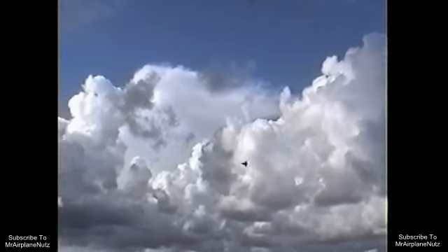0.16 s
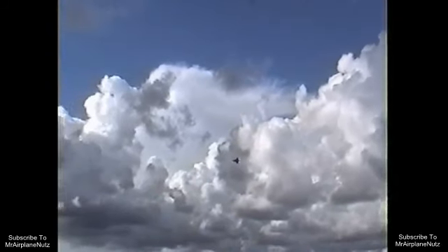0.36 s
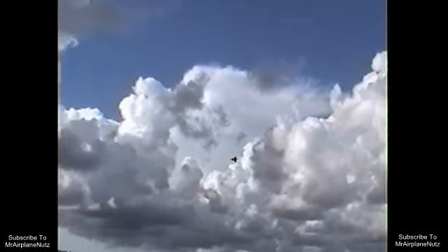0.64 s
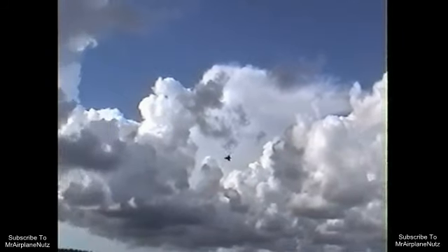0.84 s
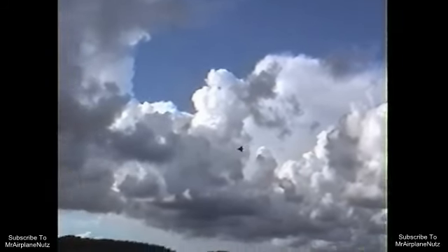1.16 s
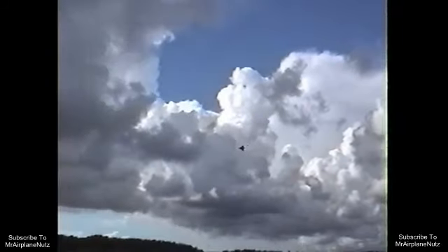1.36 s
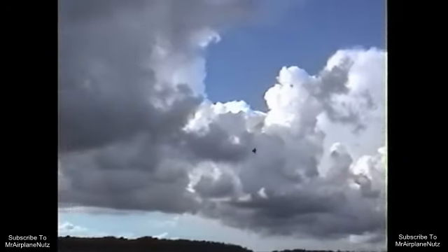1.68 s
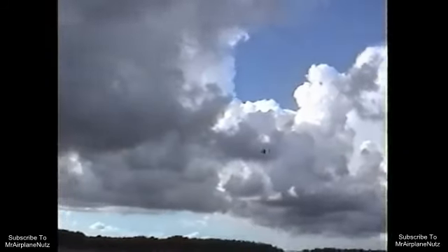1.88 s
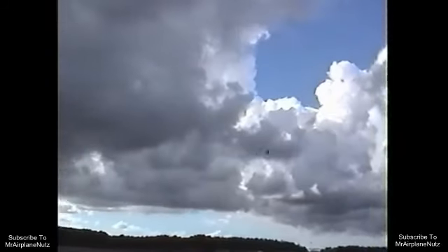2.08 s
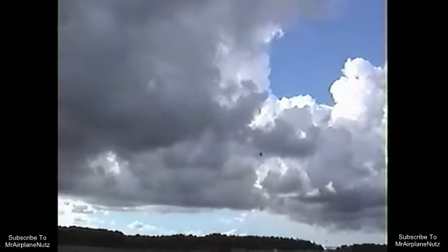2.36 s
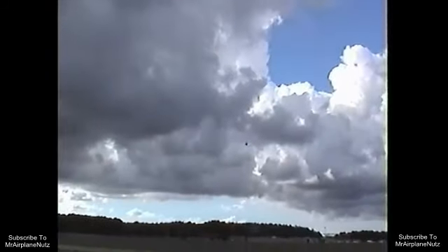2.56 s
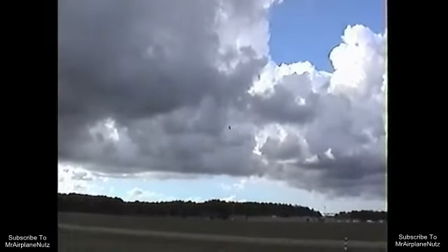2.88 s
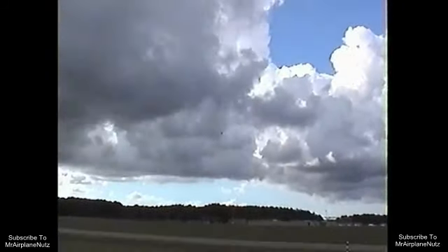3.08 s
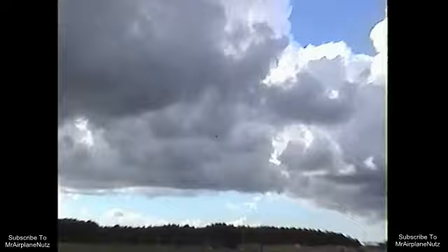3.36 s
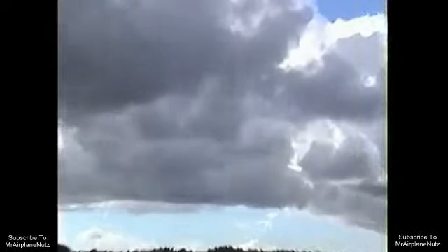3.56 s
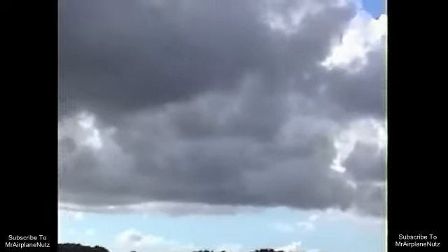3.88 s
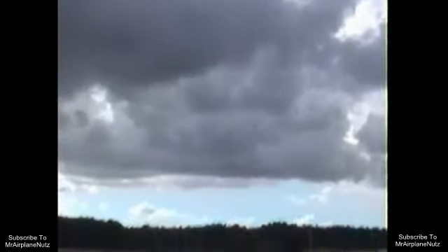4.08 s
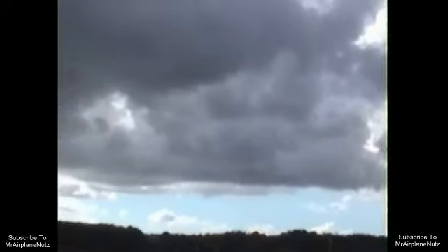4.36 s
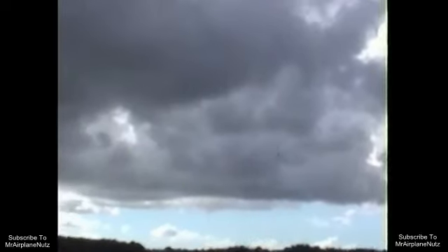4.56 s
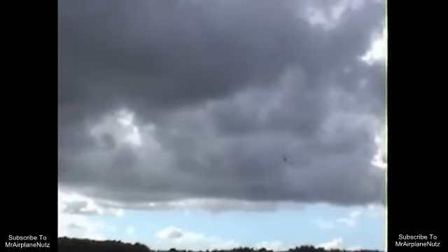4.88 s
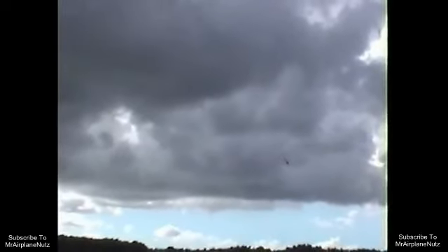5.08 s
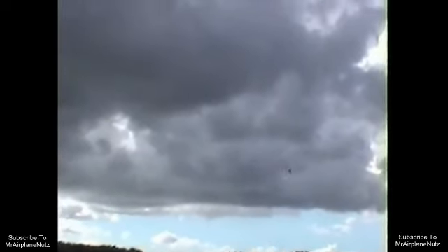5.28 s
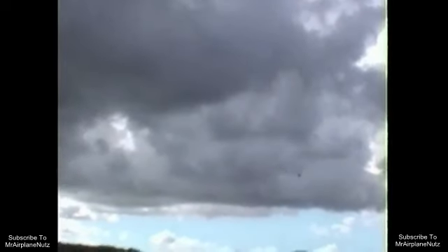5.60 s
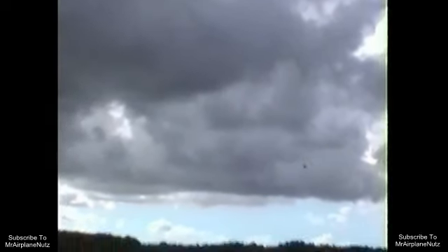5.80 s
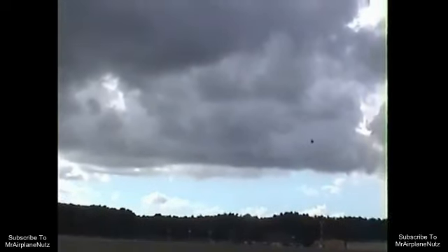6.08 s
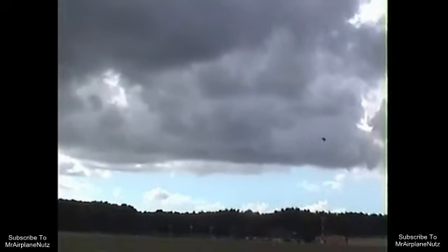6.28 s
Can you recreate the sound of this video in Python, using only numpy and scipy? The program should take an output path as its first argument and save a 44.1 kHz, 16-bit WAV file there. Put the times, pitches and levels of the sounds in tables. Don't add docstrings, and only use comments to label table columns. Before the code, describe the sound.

A far jet's broad, low-mid exhaust noise fills an outdoor field, fluttering in uneven gusts with wandering hollow howls. Shock crackle and rasp join it as the jet turns, with sharp little shutter and handling clicks close to the microphone. Strong mid-way gusts flatten and roughen in the cheap camcorder microphone; afterward the roar softens, with a duller, rumbling close and slight hiss.

```python
import sys
import numpy as np
from scipy import signal
from scipy.fft import rfft, irfft, next_fast_len
from scipy.io import wavfile
from scipy.ndimage import uniform_filter1d

SR = 44100
rng = np.random.default_rng(int(sys.argv[2]) if len(sys.argv) > 2 else 0)


def wav_out(sig):
    wavfile.write(sys.argv[1], SR, np.round(np.clip(np.atleast_2d(sig).T, -1, 1) * 32767).astype(np.int16))


def elevation(decibels):
    levels = np.asarray(decibels, float)
    return 10 ** (levels / 20)


N = 283563

# start in seconds, length in seconds, level in dB.
RUSTLES = [
    (0.062, 0.3, -61.5),
    (0.159, 0.14, -50.5),
    (0.286, 0.13, -73),
    (.5, 0.11, -54.5),
    (1.025, 0.04, -45),
    (1.078, .065, -44.5),
    (2.312, 0.058, -56),
    (2.402, 0.087, -53.5),
    (5.928, 0.079, -59.5),
    (6.22, 0.25, -70),
]
# time in seconds, peak in dB.
CLICKS = [(0.0682, -53.5), (0.172, -33.5), (0.2064, -43), (0.234, -47), (0.2677, -30.5), (1.0301, -35),
          (1.0914, -47), (1.1124, -37.5), (1.3458, -46), (1.3785, -49), (1.4641, -54.5), (1.6696, -45),
          (1.7015, -49), (1.8013, -45.5), (1.87, -42), (1.917, -50), (1.9914, -44), (2.0218, -38.5),
          (2.2428, -40.5), (2.3286, -36.5), (2.3444, -42), (2.4119, -38), (2.4364, -29), (2.451, -22),
          (2.4768, -43.5), (2.5242, -39), (2.589, -40), (2.6994, -45.5), (2.8324, -43.5), (2.8544, -45),
          (3.019, -41.5), (3.0833, -38), (3.1736, -39.5), (3.3123, -55), (3.3683, -39), (3.3992, -35),
          (3.417, -37.5), (3.4989, -37.5), (3.6194, -35), (4.1454, -44.5), (4.1894, -51.5), (4.2527, -43.5),
          (4.2757, -44), (4.3001, -39.5), (4.4218, -43), (4.4433, -46.5), (4.5515, -38.5), (4.575, -40),
          (4.6594, -56), (4.7016, -48), (4.789, -59), (4.8648, -51), (4.9721, -51), (5.023, -53),
          (5.9314, -58), (5.9574, -48), (6.2237, -47.5), (6.3255, -56), (6.3525, -53)]
# time in seconds, peak in dB.
SHOCK_FRONTS = [(1.2426, -28), (1.2752, -21.5), (1.378, -21.5), (1.5876, -21), (1.614, -26.5),
                (1.6459, -23), (1.911, -30), (1.988, -26), (2.0214, -19), (2.0545, -24), (2.148, -18),
                (2.2215, -20), (2.278, -23.5), (2.439, -15), (2.6042, -19.5), (2.8053, -24.5), (2.915, -30),
                (2.9592, -26.5), (2.9879, -24.5), (3.2106, -23.5), (3.4163, -18), (3.4926, -23),
                (3.5143, -30.5), (3.802, -16), (4.022, -17.5), (4.1916, -25.5), (4.255, -26), (4.2877, -20),
                (4.3646, -30.5), (4.422, -33.5), (4.4431, -24), (4.469, -25), (4.5057, -22.5),
                (4.6025, -22), (4.702, -20), (4.789, -29.5), (4.8681, -22), (4.917, -35), (4.9427, -26),
                (4.971, -19.5), (4.9913, -27), (5.063, -22.5), (5.14, -25.5)]
# frequency in Hz, density in dB per Hz.
EXHAUST_COLOR = [(15, -73), (25, -27.5), (81, -25.5), (110, -15.5), (150, -9.5), (202, -12), (257, -5.5),
                 (438, -1), (637, -1), (811, -2), (1280, -5), (1550, -10.5), (1900, -11.5), (2430, -14.5),
                 (2700, -16.5), (3050, -17.5), (3500, -24), (4300, -30), (5280, -39), (6200, -48.5),
                 (8000, -60), (15000, -78.5)]
REGIONS_HZ = (90, 160, 280, 430, 1050, 2800)
# time in seconds, level in dB, haze (rasp lost in the air) in dB.
FLIGHT_PATH = [(0, -20, 21), (.73, -22.5, 19), (.8, -23.5, 12), (1.23, -23.5, 9), (1.29, -18.5, 7.5),
               (2.0, -24.5, 5), (2.33, -25.5, -0.5), (2.85, -22.5, 6), (3.15, -23.5, 8),
               (3.35, -30.5, -0.5), (3.72, -17, 9), (4.1, -22.5, 8), (4.33, -30.5, 7), (4.55, -26, 8.5),
               (5.14, -23, 14), (5.19, -24.5, 16.5), (5.5, -29.5, 11), (5.78, -34, 9), (6.43, -28.5, 10)]
# time in seconds, share from 0 to 1.
TAIL_ON = [
    (0, 0.24),
    (.9, 0.09),
    (1.5, 0.38),
    (3.1, 0.37),
    (3.72, 0.82),
    (4.35, 0.52),
    (4.8, 0.8),
    (5.5, 0.6),
    (6.43, 0.82),
]
# time in seconds, rise and fall in seconds,
# low roar in dB, upper roar in dB.
AIR_GUSTS = [(0.172, 0.13, -6, -1), (.66, 0.18, 5.5, 2), (0.797, 0.19, 0.5, -3.5), (1.082, 0.22, 7.5, 1.5),
             (1.34, 0.067, -10, 2), (1.56, 0.06, 4.5, -0.5), (1.678, 0.033, -8, -1), (1.772, 0.051, 1.5, 3),
             (2.08, 0.21, 1, 4.5), (2.283, 0.11, -6, 5.5), (2.572, 0.055, 4.5, 6.5),
             (2.882, 0.072, 5, -3.5), (2.928, 0.089, -10.5, -2.5), (3.057, 0.031, -3.5, 9.5),
             (3.166, 0.062, -2.5, -3), (3.228, 0.045, -5, -0.5), (3.51, 0.048, 6, 3), (3.6, 0.072, -6, -1),
             (3.666, 0.029, 9.5, -4), (3.845, 0.027, -5, -6.5), (4.012, 0.15, 0.5, 3),
             (4.141, 0.078, 1, 1.5), (4.218, 0.047, -3.5, 6), (4.492, 0.17, 4.5, -3.5),
             (4.818, 0.035, -2.5, 2.5), (4.958, 0.082, -5.5, -4), (5.1, 0.041, 7, 13),
             (1.22, 0.044, 4, 3.5), (1.42, 0.038, 3, -3), (.45, 0.058, 2, 3), (2.45, 0.051, 3, 4.5),
             (3.33, 0.058, 0, 4.5), (3.76, 0.046, -3.5, 1.5), (3.92, 0.04, 3.5, 7.5),
             (4.299, 0.042, 1.5, 3.5), (4.6, 0.044, 2, 2.5), (4.72, .03, -1, -0.5), (4.52, .025, 0.5, 0.5),
             (.8, .05, 3.5, 6), (1.8, 0.051, 3, 3), (5.5, 0.15, 1, 1), (5.681, 0.067, -5.5, 0),
             (5.899, 0.072, -1, 2), (6.3, 0.052, -0.5, 0), (.04, 0.13, -1.5, 4.5), (1.9, 0.054, 3.5, -2),
             (5.249, 0.22, 1, -2.5), (6.028, 0.14, 7, 3.5), (6.118, 0.018, 10, -1), (5.0, .04, 2, 0.5),
             (4.75, .05, -3, -2), (1.72, 0.088, 1, -2.5)]
# time in seconds, size in dB.
RUMBLE_BOOMS = [(0.111, 0), (0.502, 12), (.75, 5.5), (.95, -1.5), (1.13, 0), (1.22, -8), (1.339, 7),
                (1.52, 4), (1.75, 3.5), (2.08, 7), (2.4, 4.5), (2.701, 5), (2.851, 3.5), (3.15, -3),
                (3.4, -5.5), (3.67, 3), (3.98, 8), (4.28, 6), (4.65, -5.5), (4.85, -1.5), (5.1, -1),
                (5.37, 4), (5.6, 6), (5.901, 5.5), (6.18, -1), (6.42, 3.5)]
# time in seconds, rise and fall in seconds, size in dB.
AIR_VEILS = [(1.0, 0.32, -12.5), (2.3, 0.31, -0.5), (3.52, 0.91, 5.5), (4.24, 0.27, 6.5), (4.75, 1, 10),
             (6.2, 0.23, -4), (.55, 0.16, 4.5), (1.3, .1, -4.5), (1.7, 0.17, 3), (2.05, 0.07, 8.5),
             (2.85, 0.09, 7.5), (3.85, 0.12, 5), (5.3, .1, 2.5), (5.7, 0.27, 1.5)]
# time in seconds, comb spacing in Hz, share from 0 to 1,
# phase turn on the soft grass in radians.
GROUND_ECHO = [(0, 320, 0.3, 2.54), (.6, 364, 0.5, 3.8), (1.2, 358, 0.33, 2.5), (1.8, 323, 0.23, 3.7),
               (2.2, 414, 0.44, 2.2), (2.6, 418, 0.47, 0.72), (3.3, 405, 0.17, 0.18), (4, 487, 0.5, 0.33),
               (5, 457, 0.71, 0.033), (5.7, 485, 0.08, 0.11), (6.43, 458, 0.18, 0.082)]
# time in seconds, center in Hz, level in dB.
LOW_HOWL = [(0, 499, -1), (.2, 491, -8), (.4, 501.6, -4.5), (.6, 518, -5), (.85, 523, -7.5),
            (1.0, 500, -6.5), (1.2, 520.4, -1), (1.5, 542, -2), (1.7, 549.3, -5.5), (1.9, 530, -9.5),
            (2.2, 501, -2.5), (2.45, 480.5, -1), (2.75, 448.7, -3), (3.0, 439.6, 0.5), (3.2, 420.3, -1),
            (3.45, 450, -3.5), (3.65, 399.7, -9), (4.05, 449.6, -2), (4.3, 441, -6.5), (4.55, 450.2, -2),
            (4.8, 441, -9), (5.05, 449.8, -2.5), (5.25, 440, -6), (5.5, 451.5, -4.5), (6.0, 430.5, -5),
            (6.43, 440.5, -4)]
# time in seconds, rise and fall in seconds, size in dB.
HIGH_HOWL_FLARES = [(.03, .05, 7), (.45, .1, 5), (.85, .1, 5), (1.25, .08, 2), (1.5, .1, 5), (1.75, .12, 5),
                    (2.0, .1, 1.5), (3.55, .08, -6), (3.95, 0.11, 4), (4.28, 0.061, 1), (4.45, .08, -6),
                    (4.6, 0.059, -3.5), (4.7, .03, 6), (4.82, 0.05, 9), (4.95, .06, 0), (5.07, 0.054, 8),
                    (5.22, .08, -3), (5.5, .12, 0), (6.04, .06, 6)]
# time in seconds, center in Hz, level against the roar in dB.
BANKING_HOWL = [(1.75, 638, -45), (1.95, 659.7, -5), (2.1, 662, -3.5), (2.23, 791, 8.5), (2.33, 898.5, -5),
                (2.45, 950.4, 7.5), (2.52, 970, 0), (2.58, 1000, 4), (2.66, 906, -4), (2.82, 801, -1),
                (2.95, 810, -17), (3.06, 802, 12), (3.15, 805, -14), (3.3, 805, -46)]
# start in seconds, length in seconds, share of the squeeze from 0 to 1,
# excess gain in dB, tearing in dB.
MIC_OVERLOADS = [(3.396, 0.16, 0.47, 0.5, -60.5), (3.602, .05, .5, 0.1, -59), (3.655, .07, 1, -0.5, -48),
                 (3.719, 0.038, 0.84, 0, -37), (3.761, .075, 1, -1, -42.5), (3.839, 0.033, .6, 0.5, -66),
                 (3.853, .112, 0.92, -1, -47), (3.974, 0.15, 1, 1, -46), (4.117, 0.12, .4, -0.5, -58),
                 (3.508, 0.98, 0.66, -0.5, -55), (4.24, 0.064, 0.094, 2.5, -57),
                 (5.062, .014, 0.63, 4.5, -54.5), (5.103, .01, .9, 0.5, -47.5),
                 (5.078, 0.025, 0.95, 0, -49.5), (5.133, .016, 0.91, 2.5, -55),
                 (5.144, 0.012, 0.97, 0.5, -55)]


def in_time(rows):
    s, *columns = np.transpose(rows)
    return [np.interp(np.arange(N) / SR, s, c) for c in columns]


def rms_one(x):
    return x / np.sqrt(np.mean(x ** 2) + 1e-20)


def band(x, low_hz, high_hz):
    return signal.sosfilt(signal.butter(2, [low_hz, min(high_hz, .45 * SR)], "band", fs=SR, output="sos"), x)


def soft(x, hz, kind="low"):
    return signal.sosfilt(signal.butter(1, hz, kind, fs=SR, output="sos"), x)


def drift(rate):
    r = np.exp(-80 * np.pi * rate / SR)
    slow = signal.lfilter([1], [1, -2 * r, r * r], rng.standard_normal(N // 40 + 2002))[2000:]
    return np.interp(np.arange(N) / 40, np.arange(len(slow)), rms_one(slow))


def delayed(x, seconds):
    return np.interp(np.arange(N) - seconds * SR, np.arange(N), x)


def swells(s, length_s, size_db):
    coarse = np.arange(0, N + 32, 32)
    x = (coarse / SR - np.reshape(s, (-1, 1))) / np.reshape(length_s, (-1, 1))
    bumps = np.cos(np.pi / 2 * np.clip(x, -1, 1)) ** 2
    return np.interp(np.arange(N), coarse, np.asarray(size_db) @ bumps)


def spans(start_s, length_s, size, edge_s):
    x = np.arange(N) / SR - np.reshape(start_s, (-1, 1))
    inside = np.minimum(x, np.reshape(length_s, (-1, 1)) - x)
    return np.asarray(size) @ np.clip(inside / edge_s + .5, 0, 1)


def dying_away(strikes, tail_s):
    return signal.lfilter([1], [1, -elevation(-60 / (tail_s * SR))], strikes + 1e-18)


def ducked():
    return np.clip((np.arange(N) / SR - 1.12) / 0.35, 0, 1)


def airfield():
    wind = band(rng.standard_normal(N), 14, 90) * elevation(2.0 * drift(6))
    hiss = band(rng.standard_normal(N), 4600, 12000) * elevation(1.4 * drift(8))
    hiss = hiss + .2 * rng.standard_normal(N)
    return elevation(-54.5) * rms_one(wind) + elevation(-64 - 13 * ducked()) * rms_one(hiss)


def clicks(rasp_db):
    tail_s, rise_s, trim_db = .02, .004, -2.5
    s, peak_db = np.transpose(CLICKS)
    strikes = np.zeros(N)
    strikes[[min(round(t * SR), N - 1) for t in s]] = elevation(peak_db + trim_db)
    stray_db = 1.5 * rasp_db - 14 + 3.0 * rng.standard_normal(N)
    strikes += (rng.random(N) < 9 / SR) * elevation(stray_db)
    dying = dying_away(strikes, tail_s)
    for _ in range(2):
        dying = uniform_filter1d(dying, size=round(rise_s * SR))
    return 1.94 * dying * rng.standard_normal(N)


def rustling():
    grains = elevation(4.5 * np.minimum(rng.exponential(1, N), 4))
    grains = grains * (rng.random(N) < 2500 / SR) * rng.choice([-1, 1], N)
    s, length_s, level_db = np.transpose(RUSTLES)
    level = spans(s, length_s, elevation(level_db), edge_s=0.019)
    return 1.18 * level * elevation(2.0 * drift(40)) * rms_one(grains)


def cameras(rasp_db):
    snaps = clicks(rasp_db) + rustling()
    return band(snaps, 2800, 8500) + .13 * band(snaps, 8000, 16000)


def crackle():
    low_hz, high_hz, tail_s, trim_db = 1900, 4640, 0.018, -7.5
    s, peak_db = np.transpose(SHOCK_FRONTS)
    fronts = np.zeros(N)
    fronts[[round(t * SR) for t in s]] = elevation(peak_db + trim_db)
    dying = uniform_filter1d(dying_away(fronts, tail_s), size=100)
    burst = band(dying * rng.standard_normal(N), low_hz, high_hz)
    return 2 * band(burst, low_hz, 1.4 * high_hz)


def arrival():
    path_db, haze_db = in_time(FLIGHT_PATH)
    astern = in_time(TAIL_ON)[0]
    s, length_s, low_db, upper_db = np.transpose(AIR_GUSTS)
    low_db = swells(s, length_s, low_db)
    upper_db = swells(s, length_s, upper_db)
    level_db = path_db + low_db

    s, boom_db = np.transpose(RUMBLE_BOOMS)
    rumble_db = -44 + 27 * astern - 18 * ducked()
    rumble_db = rumble_db + swells(s, 0.11, boom_db) + 2 * drift(4.2)

    upper_balance_db = upper_db - low_db - 0.36 * haze_db - 3.5 * astern
    rasp_db = path_db - haze_db + 0.19 * upper_db
    return level_db, upper_balance_db, rumble_db - level_db, rasp_db


def mixing_noise(shape_db, rasp_db):
    hz_points, db_points = np.transpose(EXHAUST_COLOR)
    size = next_fast_len(N)
    log_hz = np.log(np.arange(size // 2 + 1) * SR / size + 1)
    color = elevation(np.interp(log_hz, np.log(hz_points), db_points))
    mixing = rfft(rng.standard_normal(size)) * color
    places = np.log([*REGIONS_HZ, 2.2 * REGIONS_HZ[-1]])
    gusts = drift(25) + .9 * drift(60)
    unrest = np.interp(rasp_db, [-45, -32], [.5, 1])
    out = 0
    for hz in 20 * 2 ** (np.arange(30) / 3):
        part = np.clip(1 - np.abs(log_hz - np.log(hz)) * 3 / np.log(2), 0, 1)
        weights = [np.interp(np.log(hz), places, row) for row in np.eye(len(places))]
        shake_db = (min(hz, 2500) / 1000) ** .3 * unrest * (1.1 * gusts + 1.5 * drift(16))
        shake_db = shake_db + 1.0 * drift(4)
        out = out + irfft(mixing * part, size)[:N] * elevation(weights @ shape_db + shake_db)
    return out


def with_ground_echo(x):
    spacing_hz, share, turn = in_time(GROUND_ECHO)
    dull = soft(x, 1500)
    turned = np.real(signal.hilbert(dull, next_fast_len(N))[:N] * np.exp(1j * turn))
    late_s = (1 + 0.071 * drift(1.6)) / spacing_hz
    return x + np.clip(share, 0, 1) * delayed(turned, late_s)


def howl(center_hz, width_hz):
    low = signal.butter(2, width_hz / 2, fs=SR, output="sos")
    real, imag = signal.sosfilt(low, rng.standard_normal((2, N)))
    phase = 2 * np.pi * np.cumsum(center_hz) / SR
    return rms_one(real * np.cos(phase) + imag * np.sin(phase))


def howling_ridges(upper_db):
    low_hz, low_db = in_time(LOW_HOWL)
    low_hz = low_hz + 14 * drift(3.967)
    low_db = low_db - 0.32 * upper_db + 2.5 * drift(3.66)
    high_hz = 827 + 35 * drift(4)
    flare_db = swells(*np.transpose(HIGH_HOWL_FLARES))
    high_db = -10 + flare_db + 0.68 * upper_db + 2.5 * drift(7.6)
    bank_hz, bank_db = in_time(BANKING_HOWL)
    return (elevation(low_db) * howl(low_hz, width_hz=72.5)
            + elevation(high_db) * howl(high_hz, width_hz=236)
            + elevation(bank_db) * howl(bank_hz, width_hz=85))


def jet(level_db, upper_db, rumble_db, rasp_db):
    treble_db = rasp_db - level_db
    astern = in_time(TAIL_ON)[0]
    turn = in_time(GROUND_ECHO)[2]
    deep_db = rumble_db + 15 * astern
    dip_db = 0.3 * rumble_db - 5.27 * turn
    top_db = treble_db + .7 * rasp_db + swells(*np.transpose(AIR_VEILS))
    shape_db = [deep_db, rumble_db, dip_db, 0 * level_db, upper_db, treble_db, top_db]
    shape_db = np.array([c - np.mean(c) for c in shape_db])
    heard = with_ground_echo(mixing_noise(shape_db, rasp_db))
    core = band(heard, 250, 680)
    return elevation(level_db) * (heard / np.std(core) + howling_ridges(shape_db[4]))


def scene():
    heard = arrival()
    return (airfield() + cameras(heard[-1]) + crackle() + jet(*heard))[None]


def overloaded(x):
    ceiling_db, squeezed_db, edge_s, hardness = -9.3, -10.8, .013, 6.0
    s, length_s, share, excess_db, tear_db = np.transpose(MIC_OVERLOADS)
    lag = spans(s, length_s, share, edge_s)
    top = elevation(ceiling_db + (squeezed_db - ceiling_db) * lag)
    loud_db = 10 * np.log10(uniform_filter1d(x ** 2, size=round(.04 * SR)) + 1e-12)
    x = x * elevation(spans(s, length_s, excess_db, edge_s))
    x = x * elevation(-.35 * (1.5 - lag) * np.maximum(loud_db + 21, 0))
    x = x / (1 + np.abs(x / top) ** hardness) ** (1 / hardness)
    tear = np.abs(x) / top * elevation(1.0 * drift(40)) * rng.standard_normal(N)
    tear = soft(soft(tear, [3000, 6000], "band"), 11000)
    return x + 4.5 * spans(s, length_s, elevation(tear_db), edge_s) * tear


def scan_whistle():
    wobble = 1.5 * drift(8)
    level_db = -77 - 7 * ducked() + 3 * drift(5)
    return elevation(level_db) * np.sin(2 * np.pi * 15633 * np.arange(N) / SR + wobble)


def low_pass(x):
    return signal.sosfilt(signal.butter(12, 15710, fs=SR, output="sos"), x)


def record(dry):
    x = overloaded(dry[0])
    treble = soft(x, 3500, "high")
    x = x - .32 * delayed(treble, 1 / 2045)
    x = soft(x, 60, "high")
    x = x + scan_whistle()
    return low_pass(x[None])


dry = scene()
out = record(dry)
wav_out(out)
```